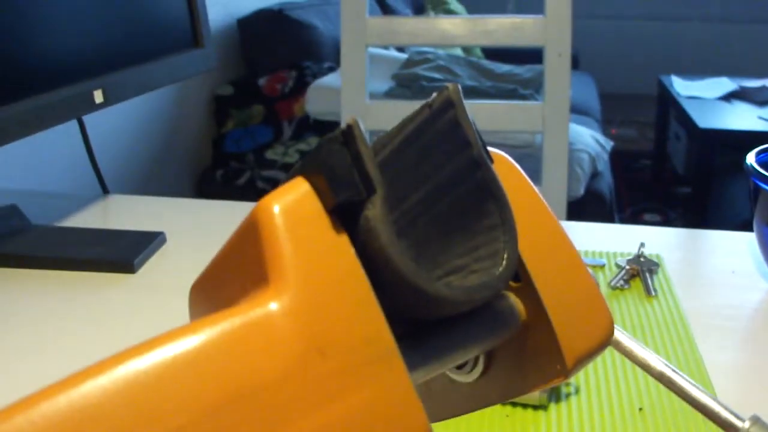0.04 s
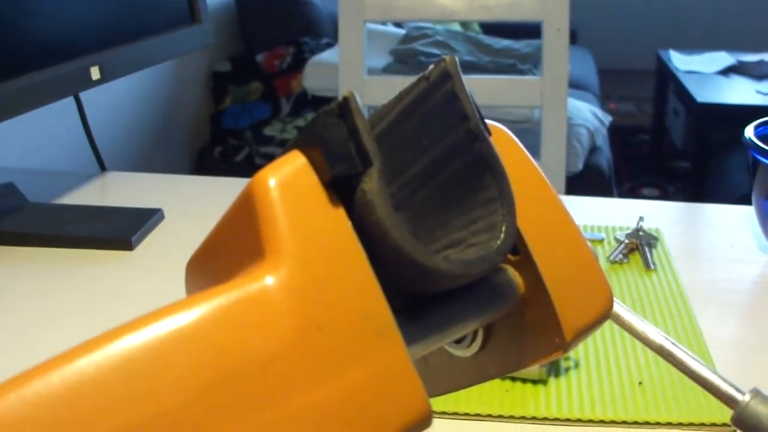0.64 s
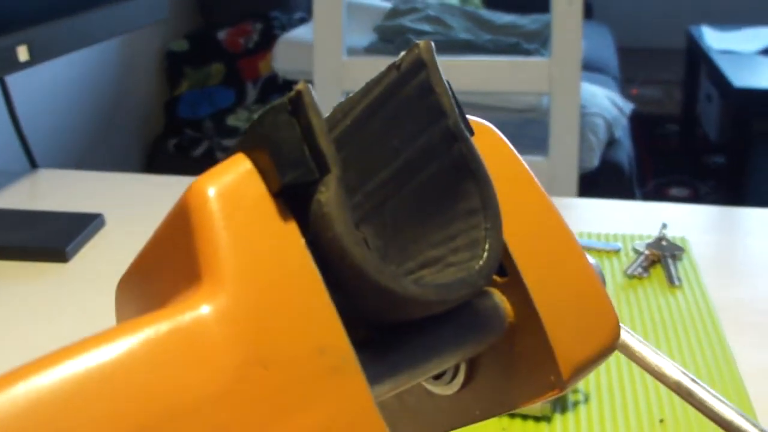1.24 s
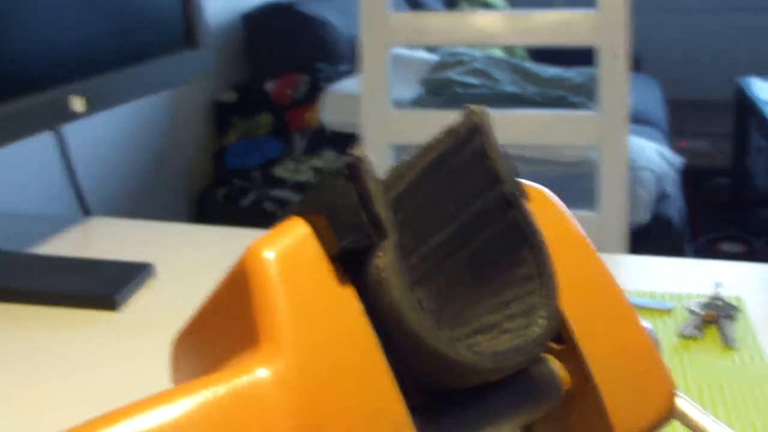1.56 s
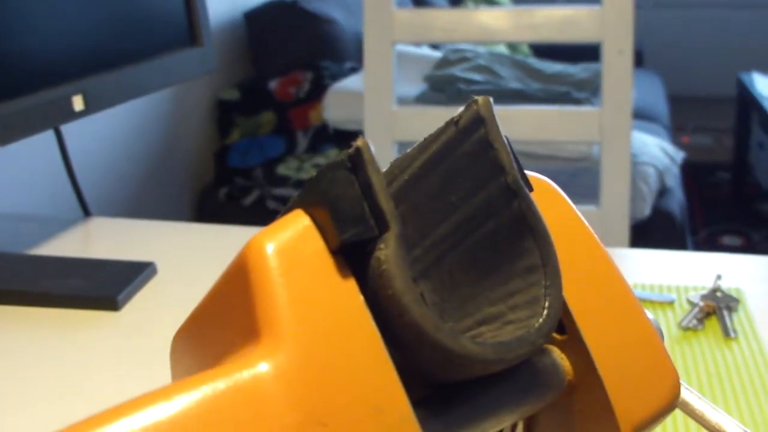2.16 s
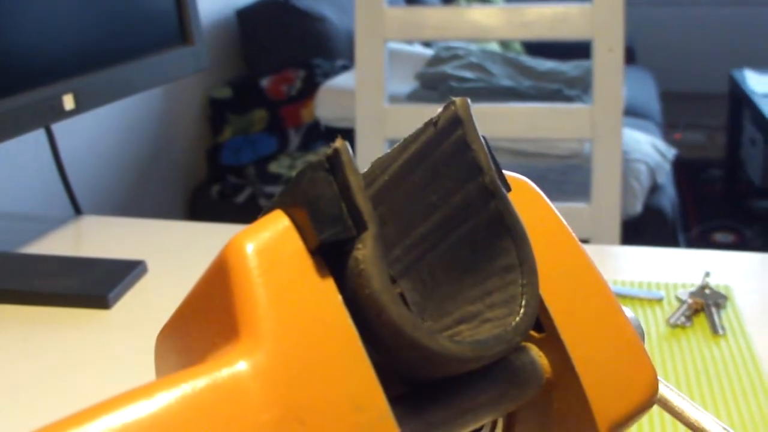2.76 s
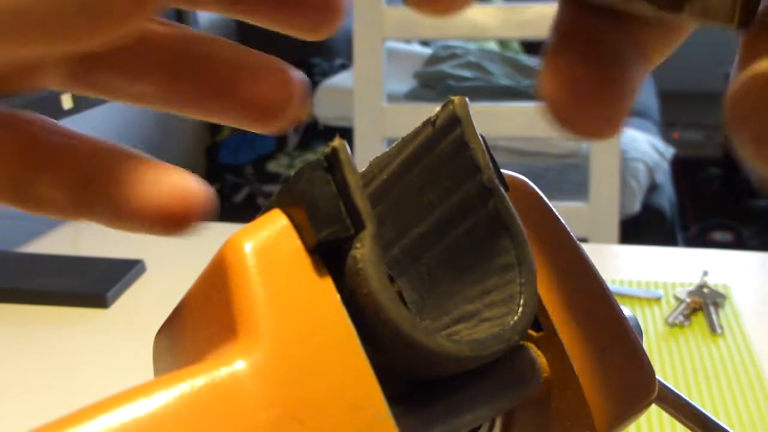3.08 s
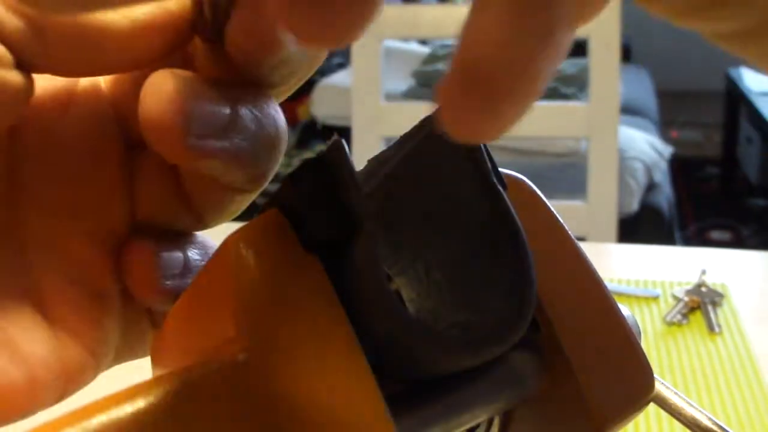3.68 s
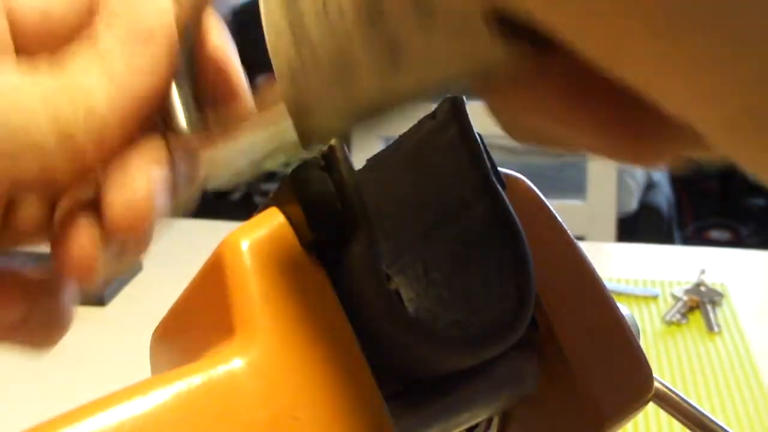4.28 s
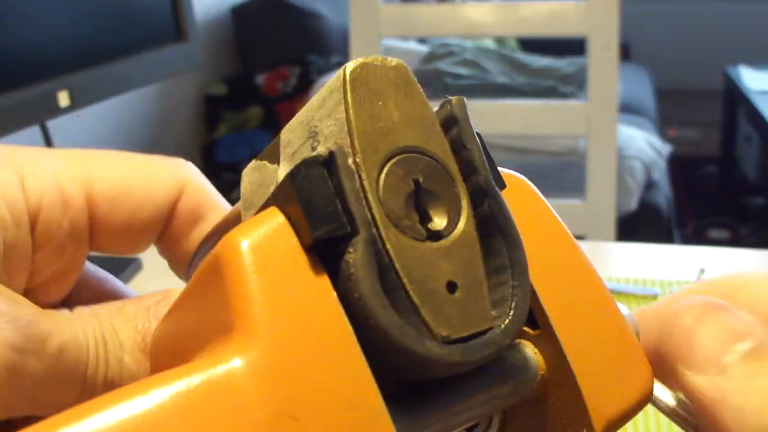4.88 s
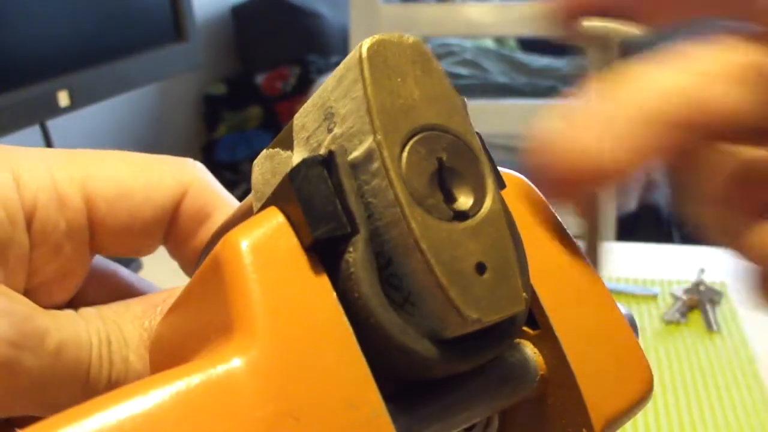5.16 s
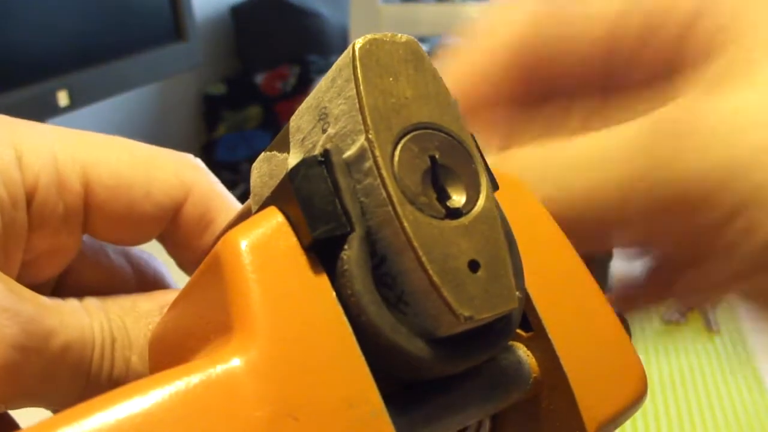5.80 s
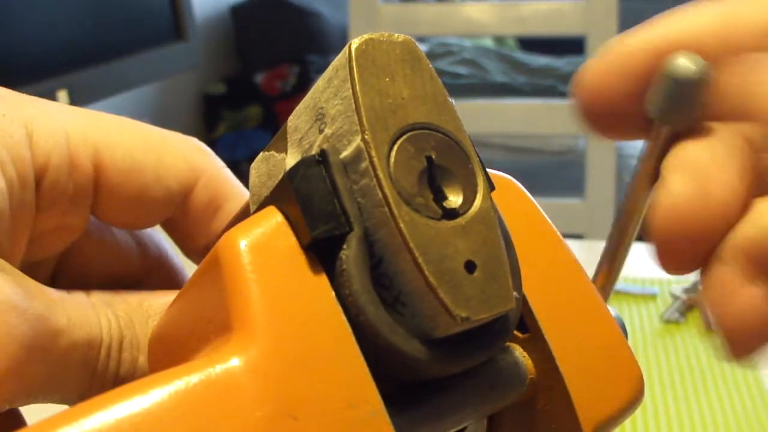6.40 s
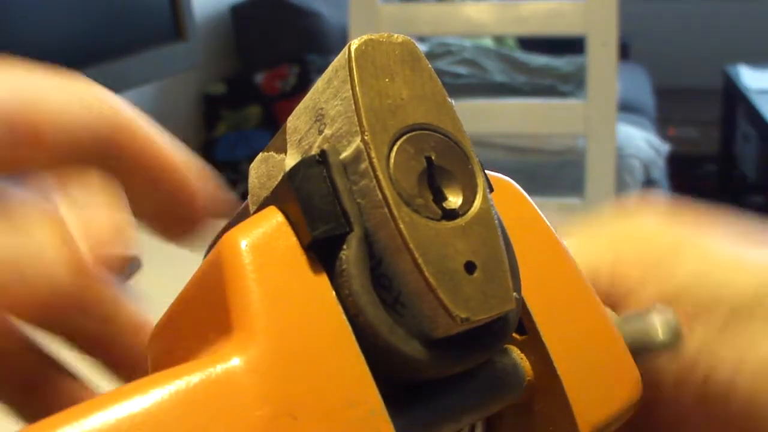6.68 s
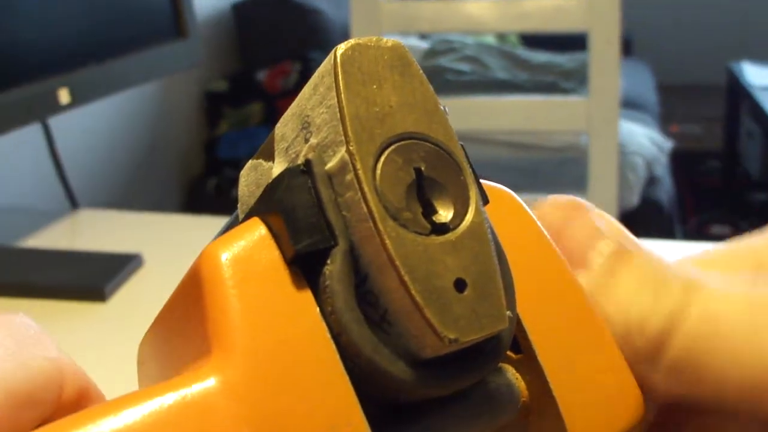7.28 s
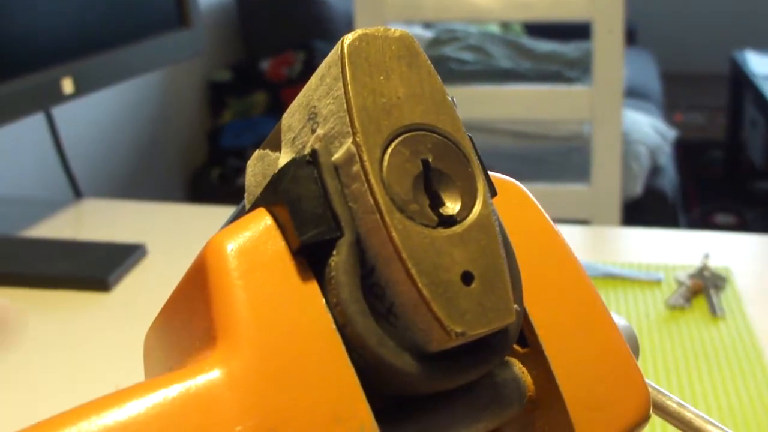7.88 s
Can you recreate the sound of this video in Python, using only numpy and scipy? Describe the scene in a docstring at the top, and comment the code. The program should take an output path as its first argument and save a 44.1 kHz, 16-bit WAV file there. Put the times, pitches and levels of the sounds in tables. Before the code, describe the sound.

A camera's plastic case clicks and creaks right at the microphone as it is nudged. A brass padlock clinks once in the hand, then drops into a bench vise with a thud that leaves the desk briefly humming. The vise is wound shut: its loose steel handle clanks and slides, the screw rasps and judders, and a few last knocks follow. Everything is close, in a small quiet room, with faint brushing of hands and sleeves.

```python
"""A bench vise on a desk in a small room, heard close up on a camera's stereo microphones.
First the camera is nudged into place: its plastic case clicks and creaks right at the microphones.
A brass padlock clinks in the hand and drops into the vise with a thud that sets the desk humming.
The vise is wound shut: its loose handle slides and clanks, the screw rasps and judders.
Hands and sleeves brush throughout, over a faint room tone."""
import sys
import numpy as np
from scipy import signal
from scipy.fft import rfft, irfft
from scipy.io import wavfile
from scipy.ndimage import uniform_filter1d

SR = 44100
rng = np.random.default_rng(int(sys.argv[2]) if len(sys.argv) > 2 else 0)


def wav_out(sig):
    """Save sig, one row per channel (or a flat mono array), as 16-bit PCM at SR to the path in sys.argv[1]."""
    wavfile.write(sys.argv[1], SR, np.round(np.clip(np.atleast_2d(sig).T, -1, 1) * 32767).astype(np.int16))


N = 354784

# The quiet room. Each row: frequency in Hz, spectral level in dB.
ROOM_TONE_COLOUR = [(30, -32), (60, -20), (90, -10.5), (125, -5), (200, -1), (330, 2), (700, 1.5),
                    (1400, -1), (2100, -3), (2550, -11.5), (3000, -25.5), (4500, -28), (9000, -49)]
# The room's decay. Each row: frequency in Hz, t60 in seconds.
ROOM_DECAY = [(100, 0.34), (300, 0.53), (1000, 0.29), (2000, 0.33), (7000, 0.45), (12000, 0.039)]
# Skin and cloth. Each row: frequency in Hz, spectral level in dB.
SLEEVE_COLOUR = [(3000, -19), (4600, -17.5), (5600, -3.5), (7500, -1), (9000, -4), (10700, -9.5),
                 (12000, -30.5), (14500, -34)]

# The camera's case, dull knocks to bright snaps.
# Each row: start in seconds, contact in seconds, level in dB, centre of the sound in Hz.
CAMERA_CLICKS = [(.0041, 0.00034, -45.5, 550), (0.1792, 0.0019, -29.5, 3140), (0.4898, 0.0018, -52, 1940),
                 (0.5004, .0012, -50.5, 1820), (.548, 0.000078, -46.5, 3640), (0.6848, 0.0015, -37, 686),
                 (.7046, 0.01, -46.5, 1440), (0.8127, 0.0023, -30.5, 2470), (.8176, 0.0054, -35, 2610),
                 (0.8242, 0.00052, -15.5, 7100), (0.8272, .0015, -23, 6500), (0.9964, 0.0021, -31.5, 690),
                 (1.024, 0.00099, -43, 250), (1.398, 0.00077, -41.5, 3330), (1.4982, 0.00062, -17.5, 1370),
                 (1.5134, 0.01, -35, 1500), (1.6497, 0.00067, -45, 1890), (1.7698, 0.0074, -51.5, 1470),
                 (2.0304, .0007, -37.5, 1050), (2.082, 0.0021, -27, 495), (2.1481, 0.00049, -30.5, 5200),
                 (2.2584, 0.00047, -36, 4800), (2.33, 0.0032, -38, 1216), (2.3602, 0.0056, -39, 1530),
                 (2.406, 0.00034, -33.5, 1750), (2.4095, 0.0031, -36.5, 1190), (2.432, 0.00066, -36, 1460),
                 (2.519, 0.0033, -51, 1200), (2.567, 0.00055, -42, 1010), (7.1058, 0.0027, -32.5, 1013),
                 (7.1148, .0026, -27.5, 960)]
# Resonances of case, vise, shackle and screw thread. Each row: frequency in Hz, width in Hz, gain in dB.
CASE_RESONANCES = [(348, 290, -0.5), (534.4, 320, 2.5), (740, 290, 2), (1277, 320, 2.5), (1845, 190, 2),
                   (2162, 210, 0.5), (3340, 370, -10.5), (5800, 990, -1), (7440, 1270, 6), (8390, 1700, 5),
                   (10810, 1100, -6.5)]
VISE_RESONANCES = [(107.1, 42, 0.5), (333, 50, 6), (419, 75, 2.5), (524, 89, 2.5), (758, 71, -5),
                   (911, 55, -7.5), (1440, 460, -11), (1790, 87, -3), (1936, 96, 2), (2417, 71, -5.5),
                   (2600, 190, -15), (5680, 170, -1), (6260, 190, 0.5), (6910, 500, 3.5), (7960, 230, -2),
                   (8750, 400, -3), (10030, 1700, -14)]
SHACKLE_RESONANCES = [(1160, 340, -4.5), (1530, 91, 2), (2270, 310, 1.5), (4750, 270, 2), (5750, 490, 0),
                      (6650, 480, 3), (7100, 470, 2.5), (8580, 170, 3), (9350, 150, 5.5),
                      (10600, 1700, -2.5)]
THREAD_RESONANCES = [(201, 46, 9.5), (422, 28, 3.5), (547, 170, -6), (780, 180, -3), (1026, 66, 0)]
# Registers in which each object is heard. Each row: low edge in Hz, high edge in Hz, stereo width in dB.
CASE_REGISTERS = [(127.5, 860, -7.5), (730, 1593, 2), (1530, 2490, -4.5), (3400, 11000, 3.5)]
VISE_REGISTERS = [(90.3, 232, -37.5), (241.4, 560, -26), (684, 1630, -1), (1630, 3110, -14),
                  (5320, 17000, -5.5)]
SHACKLE_REGISTERS = [(950, 2260, -18), (4550, 10300, -9)]
# The case's knock, clack, snap and tick: their middles in Hz, then their shares sent to the room in dB.
CASE_MIDDLES_HZ = [400, 1200, 2000, 7000]
CASE_SEND_DB = [-14, -21, -26, -32.5]
# The ping of the camera's stand. Each row: frequency in Hz, level in dB, t60 in seconds.
STAND_MODES = [(2206, 0, 0.086)]

# Rubs of fingers, camera and padlock, and the handle's rattle dying away after its loud clank.
# Each row: peak time, swell and fade in seconds, level in dB, centre of the sound in Hz.
RUBS_AND_RATTLE = [(.02, 0.025, 0.099, -54, 990), (.47, 0.058, 0.038, -55.5, 3660),
                   (.75, 0.054, 0.052, -54, 1700), (.87, .04, 0.14, -57, 2200),
                   (1.201, 0.11, 0.047, -59.5, 300), (2.344, .025, .025, -46.5, 6000),
                   (3.3, 0.11, 0.043, -64.5, 8500), (3.538, 0.063, 0.055, -62.5, 6500),
                   (3.835, 0.01, 0.023, -57, 500), (4.07, 0.044, 0.066, -55, 8150),
                   (4.354, .02, 0.034, -51, 600), (4.414, 0.031, 0.044, -44, 1600),
                   (4.81, .06, .06, -62, 8050), (5.831, .011, 0.068, -31.5, 2487),
                   (6.226, 0.0074, .008, -45, 2500), (6.84, 0.1, 0.13, -59, 2000),
                   (7.78, .06, 0.046, -52.5, 900)]
# Middles of their rumble, rasp, scrape and hiss in Hz.
SWELL_MIDDLES_HZ = [300, 1700, 3400, 7500]

# Blows on the vise. Each row: start in seconds, contact in seconds, knock of the body in dB,
# clang of the steel in dB, hardness as tick above clang in dB.
VISE_HITS = [(2.904, 0.009, -42, -49, -11.5), (4.4168, 0.0098, -21.5, -16, -20),
             (4.4392, 0.0038, -41, -41, -4), (4.9984, .013, -40, -27.5, -9.5),
             (5.1247, 0.019, -51.5, -44.5, -19), (5.1918, 0.0055, -44.5, -48, -22),
             (5.2509, 0.017, -42, -39.5, -32), (5.285, 0.0071, -37, -26.5, -65),
             (5.3881, 0.0072, -34, -28.5, -6.5), (5.6675, 0.0064, -54.5, -51, -14),
             (5.7391, 0.0022, -46, -43, -6), (5.789, 0.015, -47, -42.5, -6),
             (5.8133, 0.0052, -34.5, -13, -7), (6.2308, 0.0083, -40.5, -29.5, -11.5),
             (6.6056, 0.01, -39.5, -44, -15), (6.9, 0.0095, -36, -41.5, -20.5),
             (7.03, .006, -52, -55.5, -21), (7.3795, 0.0081, -49.5, -52.5, -25.5),
             (7.504, .0025, -42, -60, -13.5), (7.5904, 0.00078, -44.5, -67.5, 6),
             (7.7001, 0.012, -27, -29, -17.5), (7.7365, 0.0071, -54, -38.5, -25),
             (7.763, 0.004, -38, -55, -7), (7.8131, .015, -44.5, -47.5, -5)]
# The steel's clang. Each row: multiple of the main pitch, level in dB, t60 in seconds.
STEEL_MODES = [(1, 6.5, 0.03), (1.082, -12.5, .05), (1.124, -1.5, 0.049), (1.256, -6.5, 0.045),
               (1.437, -19, 0.16), (3.46, -20.5, .08), (3.8, -18.5, .1), (4.74, -22, .09)]
# The main pitch shifts with the load on the jaws. Each row: time in seconds, pitch in Hz.
STEEL_PITCH = [(2.9, 1790), (4.4, 1831), (6.3, 1835), (6.9, 1780), (7.7, 1798)]
# The tightened frame and the desk under it. Each row: frequency in Hz, level in dB, t60 in seconds.
FRAME_MODES = [(337, -7.5, .055), (540, -1, 0.082)]
DESK_MODES = [(102.2, -5.5, 0.48), (126.5, 3, 0.59), (170.3, -13, .3), (214.5, -8, 0.46), (265, 0.5, 0.3),
              (386, -8.5, 0.39), (432.4, 1.5, 0.22)]
# Shackle against padlock. Each row: start in seconds, contact in seconds, clack in dB, tick in dB.
SHACKLE_CLINKS = [(3.8950, 0.00068, -44.5, -31), (3.8967, 0.0044, -41, -30)]

# How hard the screw is turned. Each row: time in seconds, effort in dB.
SCREW_EFFORT = [(4.95, -59), (5.05, -52), (5.17, -50), (5.27, -50), (5.53, -57), (5.76, -51.5), (5.95, -45),
                (6.54, -50), (6.63, -53.5), (7.51, -54), (7.67, -56), (7.95, -55)]
# The screw's friction. Each row: frequency in Hz, spectral level in dB.
FRICTION_COLOUR = [(60, -35), (100, -31.5), (200, -4), (300, -6), (430, -8), (600, -6.5), (820, 1),
                   (1250, -16), (1800, -7), (2100, -9), (2500, -19.5), (3000, -33.5)]
# The sliding handle's falling resonance. Each row: time in seconds, frequency in Hz, level in dB.
HANDLE_GLIDE = [(5.85, 2350, -54), (5.95, 2232, -46.5), (6.2, 2063, -63), (6.35, 1770, -55),
                (6.55, 1600, -54), (6.7, 1520, -63.5)]
# Centres of the recorder's treble notches in Hz.
TREBLE_NOTCHES_HZ = [3000, 4000, 5000]

BLOW_T = np.arange(SR // 8) / SR   # time axis of one blow in seconds
FULL_BLOW_DB = -14.5   # clang of a full blow on the vise
CLACK_DB = -11   # the vise's middle register against the mean of knock and clang
THUMP_DB, THUMP_FALL = -5, 0.48   # against knock in a full blow; lighter ones thump less (dB per dB)
VISE_ROOM_DB, VISE_ROOM_GROWTH = -13, 0.11   # room share of a full blow; lighter is wetter (dB per dB)
CLAMPED_S, CLAMPED_THUMP_DB, CLAMPED_RING_DB = 6.75, -14, -2   # jaws bite: less thump, the frame rings


def from_db(db):
    """Decibels to gain."""
    return 10 ** (np.asarray(db) / 20)


def rms_one(x):
    """Scale to rms 1."""
    return x / np.sqrt(np.mean(x ** 2) + 1e-30)


def blow_one(x, window_s=.02):
    """Give a short sound the energy of rms 1 held for the window."""
    return rms_one(x) * np.sqrt(window_s * SR / x.shape[-1])


def in_time(rows):
    """Curve rows to one value per sample for each column."""
    s, *columns = np.transpose(rows)
    return [np.interp(np.arange(N) / SR, s, c) for c in columns]


def at_hz(points, hz):
    """Read a table on a log-frequency axis."""
    f, value = np.transpose(points)
    return np.interp(np.log(np.maximum(hz, 1)), np.log(f), value)


def around(centre_hz, middles_hz, fall_db_per_oct, round_oct=0.61):
    """Level of each register in dB under a rounded hump on the centre."""
    octaves = np.log2(np.divide(middles_hz, centre_hz))
    return -fall_db_per_oct * (np.hypot(octaves, round_oct) - round_oct)


def band(x, low_hz, high_hz, order=2):
    """Causal band-pass."""
    sos = signal.butter(order, [low_hz, min(high_hz, SR / 2 - 100)], "band", fs=SR, output="sos")
    return signal.sosfilt(sos, x + 1e-18)


def stereo(mid, side, side_db):
    """Left and right microphone from mid and side."""
    return mid + from_db(side_db) * side * np.array([[1], [-1]])


def add(track, s, sound):
    """Mix a sound into a track at time s."""
    at = max(round(s * SR), 0)
    track[:, at:at + sound.shape[-1]] += sound[..., :N - at]


def noise(colour, side_db):
    """Stereo noise of a given colour, rms 1."""
    gain = from_db(at_hz(colour, np.fft.rfftfreq(N, 1 / SR)))
    mid, side = irfft(rfft(rng.standard_normal((2, N))) * gain, N)
    return rms_one(stereo(mid, side, side_db))


def flicker(per_s, depth_db):
    """A gain that wanders at random."""
    knots = np.arange(N) / SR * per_s
    return from_db(depth_db * np.interp(knots, np.arange(4096), rng.standard_normal(4096)))


def resonate(force, modes):
    """Parallel resonances of alternating sign."""
    out = 0
    for k, (hz, width, db) in enumerate(modes):
        r = np.exp(-np.pi * width / SR)
        poles = [1, -2 * r * np.cos(2 * np.pi * hz / SR), r * r]
        peak = signal.lfilter([1, 0, -1], poles, force + 1e-18)
        out = out + (-1) ** k * from_db(db) * (1 - r * r) / 2 * peak
    return out


def strike(modes, bands, contact_s, levels_db, first_touch, stretch):
    """A sharp first touch and a short chatter drive the modes; each register gets its own strength."""
    chatter = rng.standard_normal((2, len(BLOW_T))) * np.exp(-(BLOW_T / (stretch * contact_s)) ** 2)
    force = chatter / np.linalg.norm(chatter, axis=1, keepdims=True)
    force[0, 0] += first_touch
    body = resonate(force, modes)
    registers = []
    for (low_hz, high_hz, side_db), db in zip(bands, levels_db):
        mid, side = map(rms_one, band(body, low_hz, high_hz, order=3))
        side = rms_one(side - mid * np.mean(mid * side))   # both microphones get the same energy
        registers.append(from_db(db) * blow_one(stereo(mid, side, side_db)))
    return np.array(registers)


def ring(modes, hold_s, rise_s):
    """Modes swell, are kept up while the parts chatter, then die away."""
    out = 0
    for hz, db, t60 in modes:
        phase = 2 * np.pi * (hz * BLOW_T + rng.random())
        out = out + np.sin(phase) * from_db(db - 60 * np.maximum(BLOW_T - hold_s, 0) / t60)
    return blow_one(out * (1 - np.exp(-(BLOW_T / rise_s) ** 2)))


def room_tone(level_db=-54):
    """The small room's own faint hiss, wide across the microphones."""
    return from_db(level_db) * noise(ROOM_TONE_COLOUR, side_db=2.5)


def brushing(level_db=-66):
    """Skin and cloth slide all the time with a soft, slightly grainy hiss."""
    wander = flicker(per_s=6, depth_db=1)
    hiss = noise(SLEEVE_COLOUR, side_db=-1.0) * flicker(per_s=120, depth_db=1.2)
    return from_db(level_db) * wander * rms_one(hiss)


def camera_case(ping_db=-15):
    """Plastic parts slip and snap right at the microphones, reaching each by its own path."""
    out, send = np.zeros((2, 2, N))
    for s, contact_s, db, centre_hz in CAMERA_CLICKS + creaks():
        levels_db = db + around(centre_hz, CASE_MIDDLES_HZ, fall_db_per_oct=7.5)
        registers = strike(CASE_RESONANCES, CASE_REGISTERS, contact_s, levels_db,
                           first_touch=0.49, stretch=2.2)
        stand_ping = from_db(levels_db[0] + ping_db) * ring(STAND_MODES, contact_s, rise_s=0.00082)
        add(out, s, registers.sum(0) + stand_ping)
        add(send, s, np.tensordot(from_db(CASE_SEND_DB), registers, 1))   # mostly knocks fill the room
    return out, send


def reflections(send, side_db=-7, onset_s=0.0019):
    """The room's diffuse reflections build up within milliseconds and die soonest in the top treble."""
    t = np.arange(SR * 3 // 4) / SR
    edges_hz = np.geomspace(60, 15000, 11)
    tail = 0
    for low, high in zip(edges_hz, edges_hz[1:]):
        hz = np.sqrt(low * high)
        width_db = min(side_db + 8 * np.log10(hz / 2000), 0)   # long waves reach both microphones alike
        mid, side = band(rng.standard_normal((2, len(t))), low, high)
        wash = stereo(mid, side, width_db) / np.hypot(1, from_db(width_db))
        tail = tail + wash * from_db(-60 * t / at_hz(ROOM_DECAY, hz))
    tail = rms_one(tail * (1 - np.exp(-(t / onset_s) ** 2))) / np.sqrt(len(t))
    return signal.fftconvolve(send[:1], tail, axes=1)[:, :N]


def rubs_and_rattle(grain_db=3.5, scrape_db=-13):
    """Grainy noise swells and fades: close rubs, and the handle's rattle after its loud clank."""
    t = np.arange(N) / SR
    strength = np.zeros((4, N))
    for s, swell_s, fade_s, db, centre_hz in RUBS_AND_RATTLE:
        slope_s = np.where(t < s, swell_s, fade_s)
        envelope = np.exp(-np.minimum(((t - s) / slope_s) ** 2, 20))
        levels_db = db + around(centre_hz, SWELL_MIDDLES_HZ, fall_db_per_oct=4)
        strength += from_db(levels_db)[:, None] * envelope
    grain = stereo(*rng.standard_normal((2, N)), side_db=-6.5) * flicker(200, grain_db)
    registers = [band(grain, 125, 600, order=3), band(grain, 1200, 2500),
                 band(grain, 3100, 3750), band(grain, 5800, 9800, order=4)]
    rumble, rasp, scrape, hiss = (gain * rms_one(sound) for gain, sound in zip(strength, registers))
    return rumble + rasp + from_db(scrape_db) * scrape + hiss


def creaks(count=7, span_s=(.3, 3.2), contact_s=.003, level_db=-56.5, centre_hz=1800):
    """Rows of faint case clicks at random times and pitches while the camera is being moved."""
    return [(np.interp(when, [0, 1], span_s), contact_s, level_db, centre_hz * 2 ** (2 * pitch - 1))
            for when, pitch in rng.random((count, 2))]


def vise(rattle_db=-5, softening=0.29, tick_room_db=-4):
    """Padlock and handle knock on the vise: a dull body sound with the steel's clang on top."""
    out, send = np.zeros((2, 2, N))
    for s, contact_s, knock_db, clang_db, hardness_db in VISE_HITS:
        clamped = s > CLAMPED_S
        lighter_db = FULL_BLOW_DB - max(knock_db, clang_db)
        thump_db = knock_db + THUMP_DB - THUMP_FALL * lighter_db + clamped * CLAMPED_THUMP_DB
        clack_db = (knock_db + clang_db) / 2 + CLACK_DB
        levels_db = [thump_db, knock_db, clack_db, clang_db, clang_db + hardness_db]
        thump, knock, clack, rattle, tick = strike(VISE_RESONANCES, VISE_REGISTERS, contact_s, levels_db,
                                                   first_touch=1.0, stretch=1.11)
        soft_db = softening * min(hardness_db, 0)   # a soft touch rings mostly the main mode
        pitch_hz = np.interp(s, *np.transpose(STEEL_PITCH))
        modes = [(pitch_hz * multiple, db + soft_db * (k > 0), t60)
                 for k, (multiple, db, t60) in enumerate(STEEL_MODES)]
        clang = from_db(clang_db) * ring(modes, contact_s, rise_s=0.00099)
        if clamped:
            frame = from_db(knock_db + CLAMPED_RING_DB) * ring(FRAME_MODES, contact_s, rise_s=0.0023)
            knock = 0.76 * knock + frame
        body = thump + knock + clack + from_db(rattle_db + soft_db) * rattle + clang
        add(out, s, body + tick)
        add(out, s, desk(thump_db))
        room_share = from_db(VISE_ROOM_DB + VISE_ROOM_GROWTH * lighter_db)
        add(send, s, room_share * (body + from_db(tick_room_db) * tick))
    return out, send


def desk(thump_db, transfer_db=-3, rise_s=0.0015):
    """A thump passes down the vise and leaves the desk top humming."""
    t = np.arange(SR // 2) / SR
    hum = sum(np.sin(2 * np.pi * (hz * t + rng.random())) * from_db(db - 60 * t / t60)
              for hz, db, t60 in DESK_MODES)
    return from_db(thump_db + transfer_db) * hum * (1 - np.exp(-t / rise_s))


def shackle(room_db=-18):
    """The loose shackle rattles once in the padlock's body."""
    out = np.zeros((2, N))
    for s, contact_s, *levels_db in SHACKLE_CLINKS:
        clack, tick = strike(SHACKLE_RESONANCES, SHACKLE_REGISTERS, contact_s, levels_db,
                             first_touch=0.44, stretch=1.3)
        add(out, s, clack + tick)
    return out, from_db(room_db) * out


def screw(rumble_db=-42.5, rumble_growth=1.55, rasp_db=-43.5, rasp_growth=1.86):
    """The turning thread rumbles and the handle rasps through its eye; both grow with the effort."""
    effort_db, = in_time(SCREW_EFFORT)
    effort_db -= effort_db.max()   # levels hold at full effort; growth is in dB per dB of effort
    t = np.arange(N) / SR
    turning = (t > SCREW_EFFORT[0][0]) & (t < SCREW_EFFORT[-1][0])
    fade = uniform_filter1d(turning.astype(float), size=2000)
    friction = noise(FRICTION_COLOUR, side_db=-17)
    rumble = rms_one(band(friction, 83, 1400) * flicker(per_s=90, depth_db=1.8))
    rasp = rms_one(band(friction, 1000, 2700) * flicker(per_s=160, depth_db=3.9))
    rumble *= from_db(rumble_db + rumble_growth * effort_db)
    rasp *= from_db(rasp_db + rasp_growth * effort_db)
    return fade * (rumble + rasp)


def handle_slide(width_hz=220):
    """Friction keeps one falling resonance of the handle murmuring as it slides through its eye."""
    hz, db = in_time(HANDLE_GLIDE)
    t = np.arange(N) / SR
    sliding = (t > HANDLE_GLIDE[0][0]) & (t < HANDLE_GLIDE[-1][0])
    low_pass = signal.butter(2, width_hz / 2, fs=SR, output="sos")
    murmur = rms_one(signal.sosfilt(low_pass, rng.standard_normal(N)))
    tone = np.sqrt(2) * np.sin(2 * np.pi * np.cumsum(hz) / SR)
    return sliding * from_db(db) * murmur * tone


def thread_judder(start_s=5.946, count=8, every_s=.0307, jitter_s=0.0019,
                  first_db=-44.5, growth_db_per_s=15, spread_db=0.5, room_db=-16):
    """The spun thread sticks and slips in a quick run of dull knocks that grow a little harder."""
    out = np.zeros((2, N))
    register = (117, 1060, -31)   # low edge in Hz, high edge in Hz, stereo width in dB
    for k, (late, softer) in enumerate(rng.standard_normal((count, 2))):
        spun_s = k * every_s + jitter_s * late
        db = first_db + growth_db_per_s * spun_s - spread_db * softer
        knock, = strike(THREAD_RESONANCES, [register], contact_s=0.0015, levels_db=[db],
                        first_touch=2.7, stretch=0.76)
        add(out, start_s + spun_s, knock)
    return out, from_db(room_db) * out


def scene():
    """At the microphones: close knocks with their reflections, handling noise and the room tone."""
    direct, send = np.sum([camera_case(), shackle(), vise(), thread_judder()], axis=0)
    handling = screw() + handle_slide() + rubs_and_rattle() + brushing()
    return direct + reflections(send) + handling + room_tone()


def record(dry, notch_width_hz=250, stopband_hz=15600):
    """The recorder notches three treble pitches, clips at full scale and cuts the top."""
    for hz in TREBLE_NOTCHES_HZ:
        edges_hz = [hz - notch_width_hz / 2, hz + notch_width_hz / 2]
        dry = signal.sosfilt(signal.butter(2, edges_hz, "bandstop", fs=SR, output="sos"), dry)
    top_cut = signal.cheby2(12, 60, stopband_hz, fs=SR, output="sos")
    return signal.sosfilt(top_cut, np.clip(dry, -1, 1))


dry = scene()
out = record(dry)
wav_out(out)
```